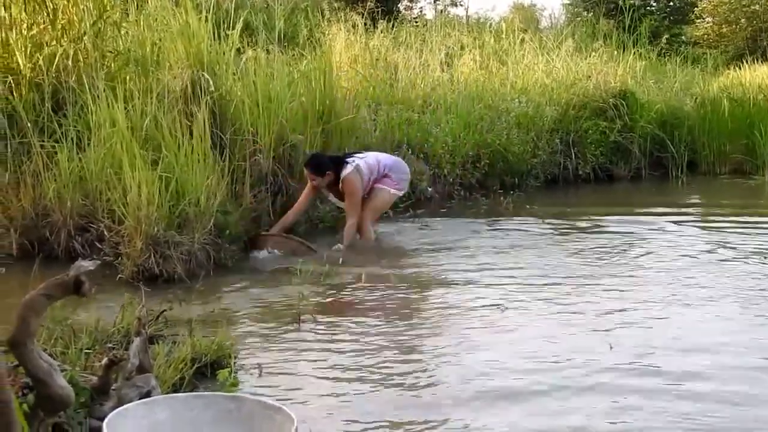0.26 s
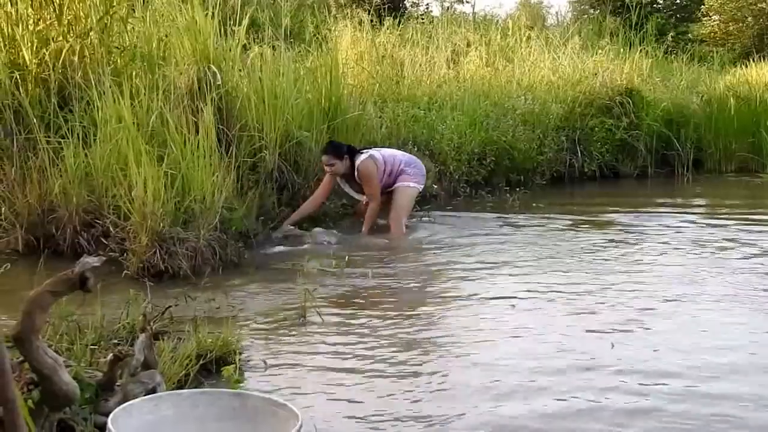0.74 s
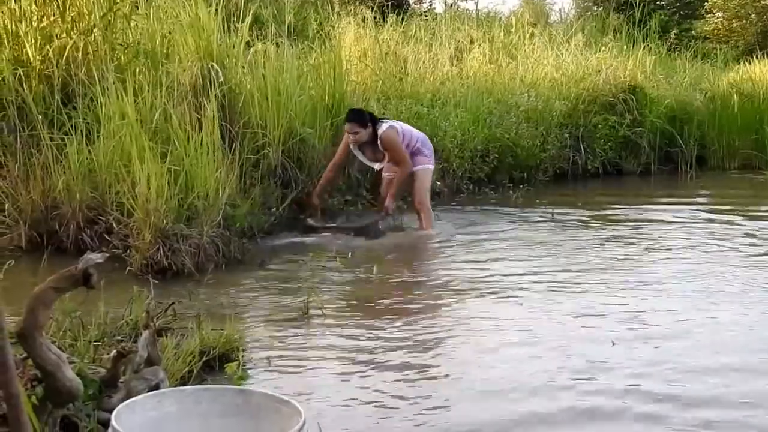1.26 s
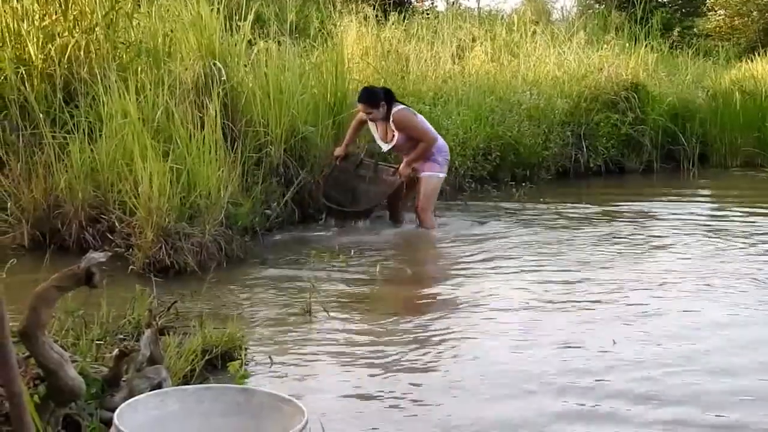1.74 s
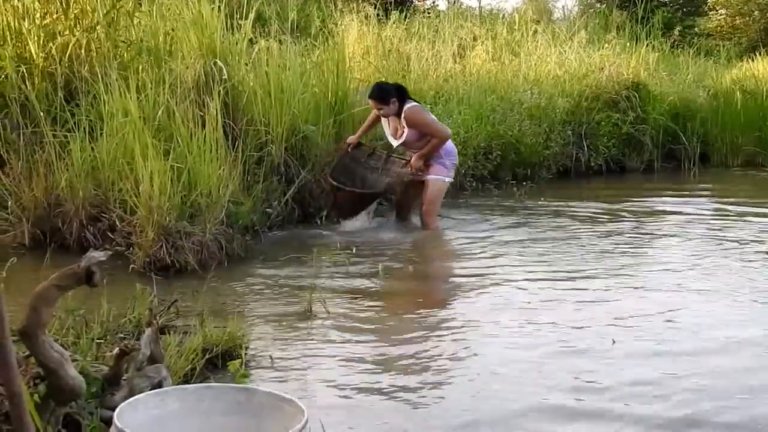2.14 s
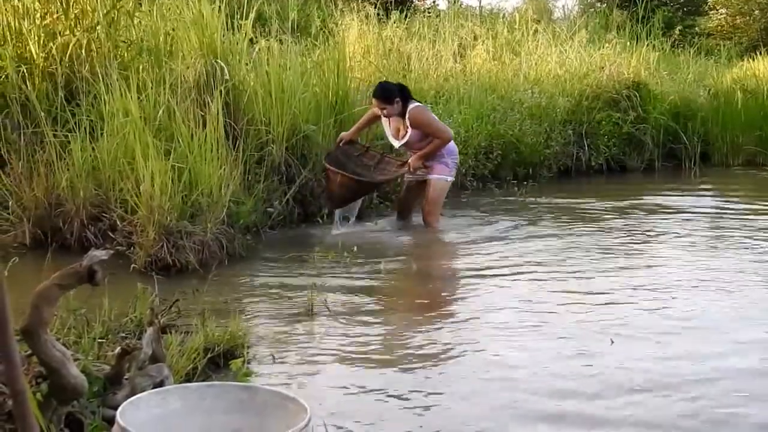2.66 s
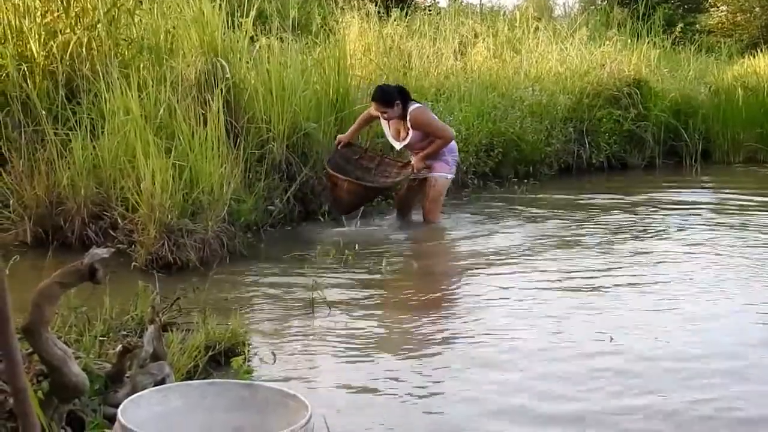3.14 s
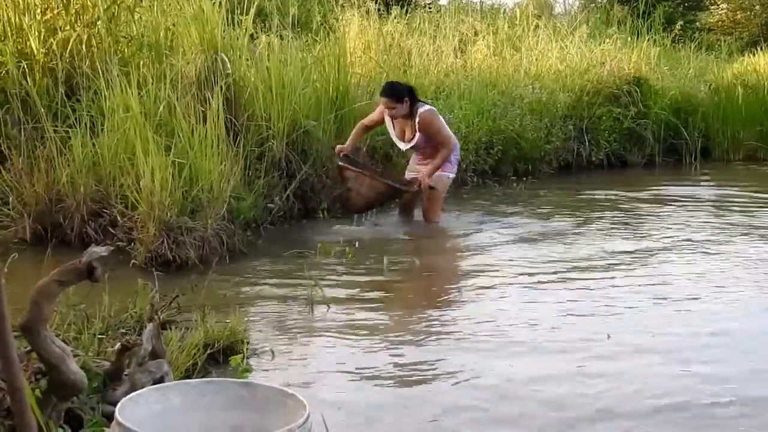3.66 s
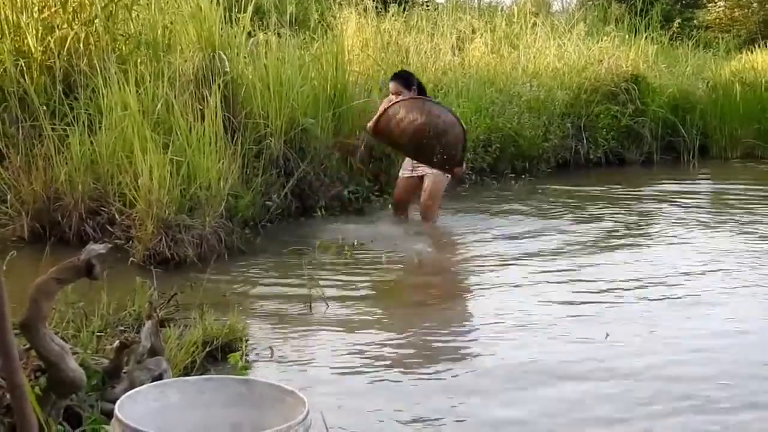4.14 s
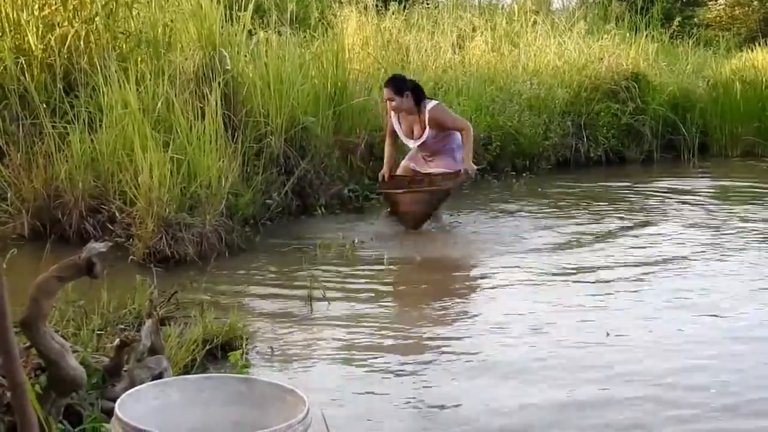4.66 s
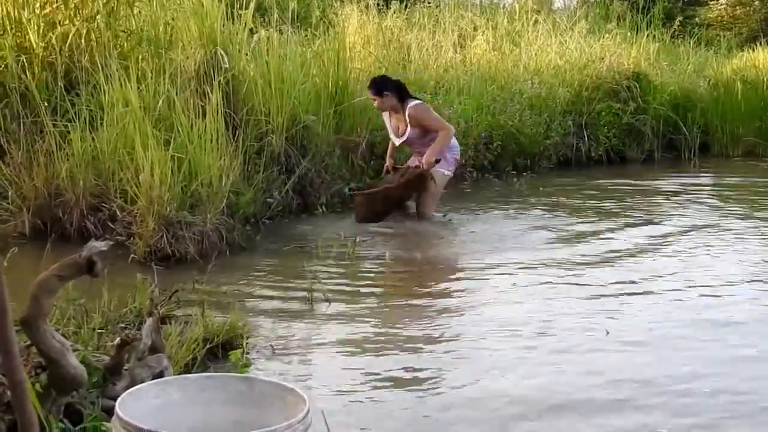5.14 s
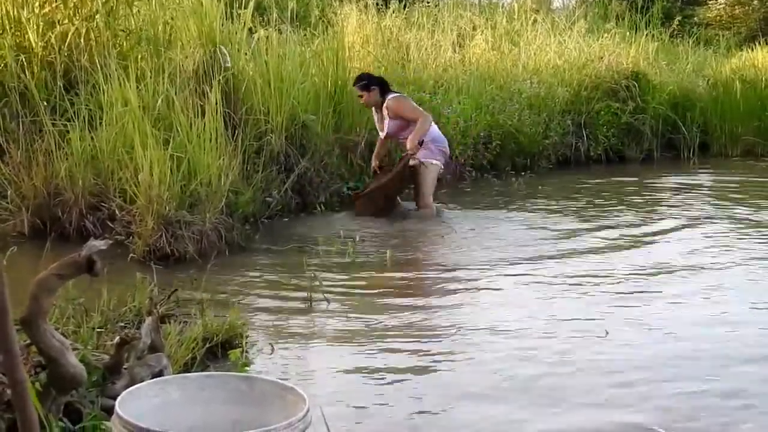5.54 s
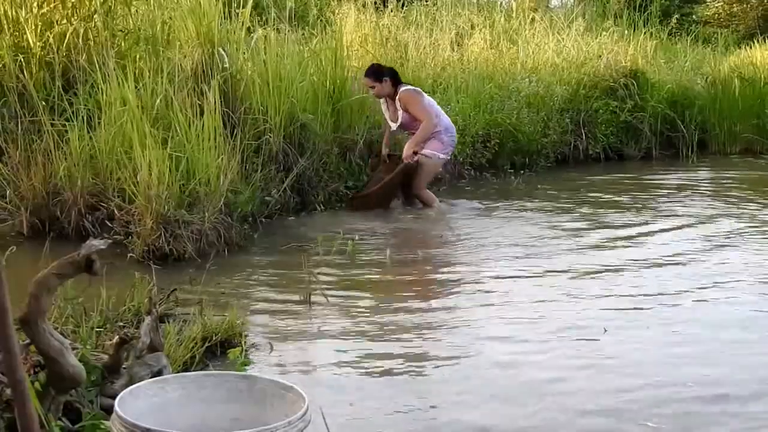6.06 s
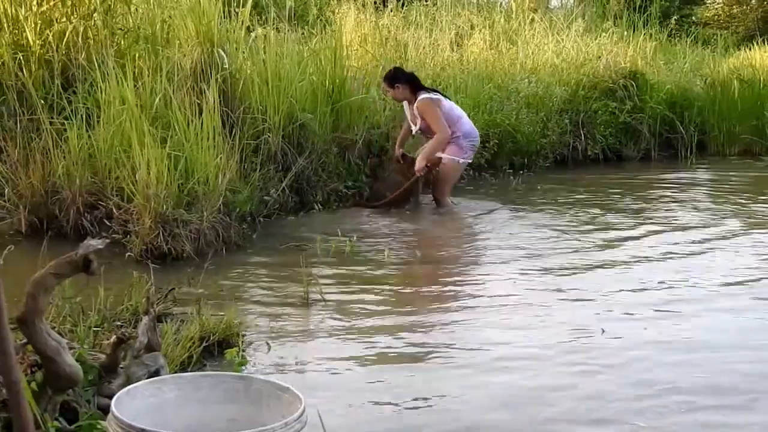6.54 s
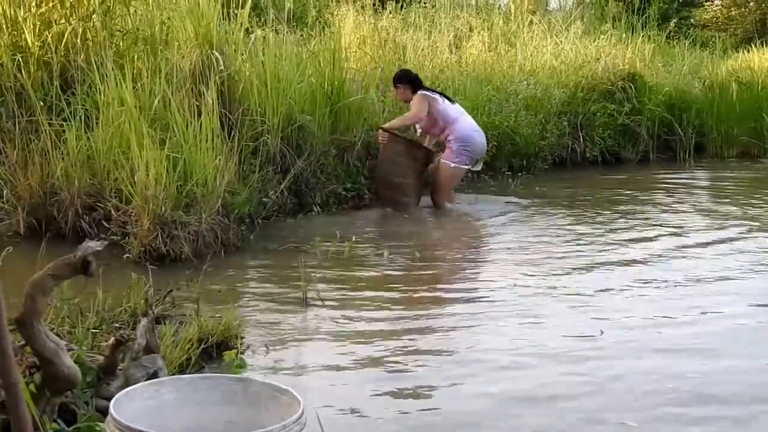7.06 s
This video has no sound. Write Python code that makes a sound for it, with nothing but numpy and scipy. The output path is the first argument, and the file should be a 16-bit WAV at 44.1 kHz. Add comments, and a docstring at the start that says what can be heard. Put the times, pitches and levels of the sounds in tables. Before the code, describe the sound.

Bubbly sloshing and splashing open at once, followed by water pouring through a lifted basket and thinning to drips. Two tiny rasping croaks pass midway. Dull slaps and small splashes lead to a heavy gulping plunge, then ripples settle. Distant slow engines throb underneath, with a high insect hiss, a cricket chirping regularly and soft falling bird whistles. Open, nearly dry field heard in stereo from the shore.

```python
"""Far engines chug and hum and insects hiss throughout, all shaped from pulses, sine waves or noise.
At once a basket scoops in a shallow stream: swarms of ringing bubbles slosh, plop and spray.
From 0.9 s the lifted basket pours, and from 2.8 s it drips; all along a cricket trills in gliding tones.
A small bird whistles falling chips from 0.9 to 4 s, and two buzzing croaks sound at 3 s. Wet smacks of
noise fall from 2.3 s, most between 4.8 and 5.8 s; at 5.9 s the basket plunges in with plops and bubbles."""
import sys
import numpy as np
from scipy import signal
from scipy.fft import rfft, irfft, next_fast_len
from scipy.io import wavfile
from scipy.ndimage import uniform_filter1d, map_coordinates

SR = 44100
rng = np.random.default_rng(int(sys.argv[2]) if len(sys.argv) > 2 else 0)


def bounce(signal):
    """Save signal as a 16-bit WAV file at the path given by the first command-line argument."""
    frames = np.transpose(np.atleast_2d(signal))
    limited = np.clip(frames, -1, 1)
    pcm = np.round(limited * 32767).astype(np.int16)
    wavfile.write(sys.argv[1], SR, pcm)


N = 321930

# Levels are in dB; some functions add a further gain.


def amp(db):
    """Turn decibels into gain."""
    return 10 ** (np.asarray(db) / 20)


def unit(x):
    """Scale to an rms (average strength) of 1."""
    return x / np.sqrt(np.mean(x ** 2) + 1e-20)


def along(points, hz):
    """Read a curve of (f/Hz, value) points on a log frequency axis."""
    f, v = np.transpose(points)
    return np.interp(np.log(hz + 1), np.log(f + 1), v)


def curves(rows):
    """Draw straight lines through timed rows: one value per sample for each column after the time."""
    s, *cols = np.transpose(rows)
    return [np.interp(np.arange(N) / SR, s, c) for c in cols]


def wobble(rate):
    """A smooth random curve through `rate` random points a second."""
    points = rng.standard_normal(int(N * rate / SR) + 4)
    return map_coordinates(points, [np.arange(N) * rate / SR], mode="nearest")


def add(track, s, sound):
    """Mix a sound into a track at s seconds."""
    part = track[max(0, round(s * SR)):][:len(sound)]
    part += sound[:len(part)]


def swell(s, attack_s, hold_s, t60_s):
    """Gain that rises from s seconds, holds, then drops 60 dB in each t60_s."""
    t = np.arange(N) / SR - s
    fading = np.maximum(t - attack_s - hold_s, 0)
    return np.clip(t / attack_s, 0, 1) * np.exp(-np.log(1000) * fading / t60_s)


def filtered(x, response):
    """Multiply the spectrum of x by a response of frequency."""
    m = next_fast_len(N + SR // 4)
    return irfft(rfft(x, m) * response(np.fft.rfftfreq(m, 1 / SR)), m)[..., :N]


def coloured(x, spectrum, size=8192):
    """Filter with the gain of (f/Hz, level/dB) points, ringing only after each sound and never before."""
    cepstrum = irfft(np.log(amp(along(spectrum, np.fft.rfftfreq(size, 1 / SR))) + 1e-6))
    # folding the cepstrum gives the minimum-phase filter
    fold = np.r_[1, np.full(size // 2 - 1, 2), 1, np.zeros(size // 2 - 1)]
    return signal.fftconvolve(x, irfft(np.exp(rfft(cepstrum * fold))))[:N]


def spread(a, b, alike):
    """Blend two unrelated signals into a stereo pair as alike as the curve asks at each pitch; rms 1."""
    def turn(hz):
        return np.arccos(np.clip(along(alike, hz), -1, 1)) / 2

    mid, side = filtered(np.array([a, b]), lambda hz: np.array([np.cos(turn(hz)), np.sin(turn(hz))]))
    return unit(np.array([mid + side, mid - side]))


def aside(x, lag_s):
    """Place a sound to one side: it reaches the right microphone port lag_s sooner than the left."""
    return filtered(x, lambda hz: np.exp(np.pi * 1j * hz * lag_s * np.array([[-1], [1]])))


def panned(x, db):
    """A stereo pair, db louder on the left than on the right."""
    return x * amp([[db / 2], [-db / 2]])


# How alike left and right are for the fields all around: f/Hz, likeness [-1 to 1]
FAR_ALIKE = [(60, 0.98), (120, 1.0), (250, 0.97), (510, 0.83), (1050, 0.84), (2130, 0.78), (4130, -0.2),
             (5500, 0.05), (9500, 0.015)]


def rush(spectrum, alike=FAR_ALIKE):
    """Stereo noise with the given colour; rms 1."""
    noise = rng.standard_normal((2, N))
    return spread(*filtered(noise, lambda hz: amp(along(spectrum, hz))), alike)


# Colour of the far engine rumble: f/Hz, level/dB
RUMBLE = [(12, -61), (20, -60), (49, -19.5), (88, -10), (172, -3), (267, -13.5), (365, -20), (450, -34),
          (580, -66), (990, -120)]


def rumble():
    """Far engines blur into low noise that swells gently."""
    return amp(-35 + 1.2 * wobble(2.85)) * rush(RUMBLE)


# Colour of the air in the grass: f/Hz, level/dB
FIELD = [(250, 0.5), (420, -10), (579, -6), (698, 9), (799, 7), (886, -8), (1210, 10), (1460, -2),
         (1720, -16), (2270, -1), (2500, -13), (2920, -7), (3700, -17), (4110, -7), (5000, -37),
         (6500, -38), (11000, -120)]


def grass():
    """Air moving in the grass makes soft, nearly steady noise."""
    return amp(-51.0 + 0.12 * wobble(2.3)) * rush(FIELD)


# A thin far whirr swells and fades: t/s, level/dB
WHIRR = [(0, -50.5), (2.8, -62), (3.8, -52.5), (4.4, -50.5), (5.0, -52), (5.6, -54), (6.6, -59), (7.0, -52),
         (7.3, -47)]
# Resonances of the whirr: f/Hz, level/dB
WHIRR_COLOUR = [(480, -74), (620, -6), (730, -2.5), (900, -3.5), (1100, -19), (1240, 2), (1430, -15),
                (1650, 3.5), (1790, 5.5), (1930, -1), (2400, -43)]


def whirr():
    """Noise through a few resonances comes and goes as a thin far whirr."""
    return amp(curves(WHIRR)[0] + 2.0) * rush(WHIRR_COLOUR)


# Colour of the insect hiss: f/Hz, level/dB
INSECTS = [(2650, -20), (4500, -12), (5090, -39), (5340, -31), (5480, 7), (5930, -52), (6340, 4.5),
           (6870, 1), (7280, 11.5), (7740, 12), (8200, 3), (8510, -8), (9360, -10.5), (12200, -82),
           (20600, -120)]
# How alike left and right are for the insects: f/Hz, likeness [-1 to 1]
CHORUS_ALIKE = [(4000, 0.24), (7500, 0.17), (10000, 0.23)]


def insects():
    """Many insects merge into a high flickering hiss, a touch sooner on the left."""
    return amp(-44.0 + 0.96 * wobble(14)) * aside(rush(INSECTS, CHORUS_ALIKE), lag_s=-.00002)


# Narrow band of one far insect: f/Hz, level/dB
TRILL = [(3000, -90), (3780, -29), (3875, 9), (3925, -18), (3980, -2), (4130, -10), (4250, -28),
         (5200, -90)]


def trill():
    """One far insect trills as narrow-band noise."""
    return amp(-63) * rush(TRILL)


def firings(rate, start, exhaust, scatter_db, jitter):
    """One exhaust pulse per firing of a single cylinder, `rate` a second, uneven by jitter seconds; rms 1."""
    turns = np.cumsum(rate) / SR - start
    at = np.flatnonzero(np.diff(np.floor(turns)))  # a pulse at each whole number
    size, late = rng.standard_normal((len(at), 2)).T
    at = np.clip(at + late * jitter * SR, 0, N - 1).astype(int)
    return unit(coloured(np.bincount(at, amp(scatter_db * size), N), exhaust))


def echoed(x, delay_s, db):
    """The tree line answers once, delay_s later; rms 1."""
    return unit(x + amp(db) * np.pad(x, (round(delay_s * SR), 0))[:N])


# Exhaust colour of the chugging engine: f/Hz, level/dB
CHUG = [(25, -50), (43, -44), (72, -11.5), (100, -7.5), (140, -7.5), (175, 0), (220, -1.5), (260, -3.5),
        (300, -14), (360, -23), (450, -44), (1200, -110)]


def chugging_engine():
    """A slow engine fires 14.48 times a second, each firing a dull pulse; rms 1."""
    pulses = firings(np.full(N, 14.48), .415, CHUG, scatter_db=1.5, jitter=.00006)
    return echoed(pulses, delay_s=.048, db=-13.5)


# Speed of the labouring engine: t/s, firings a second [f/Hz]
LABOUR = [(0, 15), (1, 14.58), (2, 14.42), (3, 14.24), (4, 14.14), (4.7, 14.11), (5.5, 14.585),
          (6.3, 15.03), (7.3, 15.27)]
# Exhaust colour of the labouring engine: f/Hz, level/dB
THUD = [(25, -35.5), (44, -33), (72, 1), (100, -7), (117, 2), (135, -2.5), (160, 7.5), (180, -11),
        (215, -5.5), (245, -9), (288, -18), (314, -13), (340, -22.5), (400, -31.5), (1200, -110)]


def labouring_engine():
    """A second slow engine sags in speed and picks up again, each firing a thud; rms 1."""
    pulses = firings(curves(LABOUR)[0], .607, THUD, scatter_db=1.6, jitter=.00006)
    return echoed(pulses, delay_s=.0188, db=-3.0)


# Overtones of the pump engine: multiple of the shaft rate, level/dB
PUMP = [(1, -22), (2, 1.5), (3, -14), (4, -4.5), (5, -16), (6, -17)]


def pump(hz=50.1, start=0.285):
    """A faster engine, so far off that only its low overtones arrive, as shimmering sines; rms 1."""
    shaft = 2 * np.pi * (np.cumsum(hz + 0.025 * wobble(2.43)) / SR - start)
    hum = np.zeros(N)
    for k, (_, db) in enumerate(PUMP, 1):
        hum += amp(db + .8 * wobble(4.6)) * np.sin(k * shaft + k * k)
    return unit(hum)


# Engine loudness, with a short rise near 3.2 s where the two engines' firings fall together:
# t/s, chugging level/dB, labouring level/dB
ENGINE_LEVELS = [(0, -33.5, -33), (1.5, -36, -32.5), (2.5, -37.5, -33.5), (3.15, -36, -33.5),
                 (3.21, -32.5, -33), (3.28, -33, -33.5), (3.4, -37, -36), (4.4, -37, -36),
                 (5.2, -37.5, -36.5), (6.2, -37.5, -34.5), (7.3, -36.5, -36.5)]
# Level of the hum near 100 Hz, dipping where it beats with the chugging engine, then steadier:
# t/s, level/dB
HUM = [(0, -41.5), (0.8, -35), (1.2, -36.5), (1.5, -35), (2.09, -38), (2.56, -33.5), (3.03, -39),
       (4.04, -32), (4.51, -44), (4.72, -33), (6, -32.5), (7.3, -32)]


def engines():
    """Two slow engines drift in and out of step while the faster pump hums."""
    chug_db, labour_db = curves(ENGINE_LEVELS)
    slow = amp(chug_db) * chugging_engine() + amp(labour_db) * labouring_engine()
    return slow + amp(curves(HUM)[0]) * pump()


# Two short rough croaks: t/s, length/s, resonance f/Hz, level/dB
CROAKS = [(2.963, .038, 700, -36), (3.066, .028, 780, -39.5)]


def croaks():
    """A low rasping buzz sags in pitch as it passes through one resonance."""
    pitch_hz, fall, width_oct = 169, 0.069, 0.23
    track, k = np.zeros(N), np.arange(2, 12)[:, None]  # k counts the overtones
    for s, length_s, hz, db in CROAKS:
        u = np.linspace(0, 1, int(length_s * SR))
        phase = 2 * np.pi * np.cumsum(pitch_hz * (1 + fall * (.5 - u))) / SR
        overtones = 1 / (1 + (np.log2(k * pitch_hz / hz) / width_oct) ** 2)
        buzz = np.sum(overtones * np.sin(k * phase + rng.uniform(0, 2 * np.pi, k.shape)), axis=0)
        rasp = 1 + .5 * wobble(345)[:len(u)]
        add(track, s, amp(db) * np.sin(np.pi * np.sqrt(u)) * unit(rasp) * buzz)
    return track


# A small bird's falling chips: t/s, level/dB, middle f/Hz
CHIPS = [(0.851, -51.5, 3120), (1.53, -46, 3200), (2.82, -45, 3140), (3.0744, -56, 3110),
         (3.745, -49, 3200), (3.814, -44, 3240), (4.002, -53, 3180)]


def bird():
    """Short soft whistles that slide down."""
    chip_s, fall = .036, .16  # fall is a share of the middle pitch
    track, t = np.zeros(N), np.arange(SR // 15) / SR
    u = np.minimum(t / chip_s, 1)
    for s, db, hz in CHIPS:
        phase = 2 * np.pi * np.cumsum(hz * (1 + fall * (.5 - u))) / SR
        add(track, s, amp(db) * np.sin(np.pi * u) * np.sin(phase))
    return track


# Cricket chirps: start t/s, level/dB
CHIRPS = [(0.601, 2.5), (1.309, 2.5), (1.955, 3.5), (2.625, 2.5), (3.296, 2.5), (3.972, 3), (4.566, 2.5),
          (5.258, 3), (5.979, 2.5), (6.663, 1.5)]
# Wing strokes of one chirp, in order: level/dB
STROKES = [-43, -41.5, -41.5, -41, -50]


def cricket():
    """Each wing stroke slows as it closes, so its tone falls, wavering a little."""
    hz, fall_hz, stroke_s, period_s = 5830, 780, .026, .037
    track, t = np.zeros(N), np.arange(SR // 20) / SR
    u = np.minimum(t / stroke_s, 1)
    for s, chirp_db in CHIRPS:
        for k, db in enumerate(STROKES):
            size, sharp, late = rng.standard_normal(3)  # no two strokes are quite the same
            waver = unit(uniform_filter1d(rng.standard_normal(len(t)), size=120))
            stroke_hz = hz + 40 * sharp + 50 * waver - fall_hz * u ** 1.4
            tone = np.sin(2 * np.pi * np.cumsum(stroke_hz) / SR)
            stroke = amp(chirp_db + db + .5 * size) * np.sin(np.pi * u ** .8) * tone
            add(track, s + k * period_s + .001 * late, stroke)
    return track


# How fast the bank's echo dies: f/Hz, time to drop 60 dB [s]
BANK = [(300, 0.037), (2000, 0.35), (9000, 0.016)]


def bank(x):
    """Short diffuse answer of the grassy bank: fading noise, different on each side."""
    hz, t, z = signal.stft(rng.standard_normal((2, SR // 4)), SR, nperseg=256)
    tail = signal.istft(z * amp(-60 * t / along(BANK, hz)[:, None]), SR, nperseg=256)[1]
    return signal.fftconvolve(x[None], tail / np.linalg.norm(tail[0]), axes=1)[:, :N]


def bubble(t, hz, cycles, rise):
    """A damped sine whose pitch climbs as the bubble nears the surface."""
    age = t * hz / cycles
    tone = np.sin(2 * np.pi * hz * t * (1 + rise * np.minimum(age, 2) / 4))
    return tone * np.exp(-2 * age) * (1 - np.exp(-2 * t * hz))


def bubbles(rate, lo_hz, hi_hz, cycles, scatter_db, size):
    """A random swarm of `rate` bubbles a second, mostly quiet and a few loud; rms 1."""
    when, pitch, strength, life = rng.random((int(rate * N / SR), 4)).T[:, :, None]
    hz = lo_hz * (hi_hz / lo_hz) ** pitch
    gain = amp(-scatter_db * np.log(np.maximum(strength, .02))) * np.sqrt(hz / lo_hz)
    rings = gain * bubble(np.arange(size) / SR, hz, cycles * (.5 + life), rise=0.24)
    places = (when * N).astype(int) + np.arange(size)
    return unit(np.bincount(places.ravel(), rings.ravel(), N)[:N])


# How alike left and right are for the water in front: f/Hz, likeness [-1 to 1]
ALIKE = [(60, 0.97), (250, 0.97), (510, 0.7), (1050, 1), (2130, 0.79), (4360, 0.58), (6500, 0.26),
         (8910, 0.12)]


def churn(swarm, spectrum, wash_db, width_db):
    """Bubbles on a wash of torn water, with diffuse scatter off the ripples; rms 1."""
    direct = unit(coloured(swarm, spectrum))
    scatter = unit(coloured(rng.standard_normal(N), spectrum))
    wide = amp(width_db) * np.array([scatter, -scatter])
    return unit(direct + wide + amp(wash_db) * rush(spectrum, ALIKE))


# Colour of falling water landing on the surface, for the stream and its drips: f/Hz, level/dB
POUR = [(400, -19), (700, -16.5), (1150, 0), (1400, -3.5), (1650, 3.5), (1830, -7.5), (2060, 0),
        (2240, -14), (2480, 4.5), (2750, -7.5), (3470, -5), (4750, -1.5), (6500, 6.5), (7700, -4),
        (12000, -28.5), (16000, -120)]


def drips():
    """The raised basket keeps dripping: single small bubbles start, hold, then thin out."""
    wet = swell(2.76, attack_s=0.16, hold_s=0.96, t60_s=.8)
    drops = bubbles(90, 1800, 7000, cycles=6, scatter_db=2, size=400)
    return amp(-54.5) * wet * unit(coloured(drops, POUR))


def pour():
    """The basket empties through its weave: the gurgling stream builds, holds, then thins, wavering."""
    flow = swell(0.86, attack_s=0.89, hold_s=0.63, t60_s=4.6) * amp(-40.5 + 1.6 * wobble(29.76))
    gurgle = bubbles(900, 609, 4500, cycles=12, scatter_db=2.2, size=600)
    return flow * churn(gurgle, POUR, wash_db=0.0, width_db=-28)


# Dull wet smacks, played as noise only: t/s, level/dB, left over right level/dB
SMACKS = [(2.251, -22, 0), (3.178, -21.5, 0.5), (4.806, -20, -9), (5.154, -20, -9), (5.196, -23, -7),
          (5.311, -23, -10), (5.369, -22, -13), (5.417, -35, -6), (5.707, -23, 0), (5.73, -21, 0)]
# Colour of a smack: f/Hz, level/dB
SMACK_COLOUR = [(300, -32), (620, -1), (1100, 2), (1380, 2), (1620, 1), (2000, -7), (2450, -2), (3200, -22),
                (7000, -53)]


def smacks():
    """A soft slap on the surface: a short dull puff of noise."""
    rise_s, t60_s = 0.003, 0.036
    track, t = np.zeros((2, N)), np.arange(SR // 10) / SR
    for s, db, pan_db in SMACKS:
        puff = amp(db - 60 * t / t60_s) * (1 - np.exp(-t / rise_s)) * rng.standard_normal(len(t))
        for side, sound in zip(track, panned(puff, pan_db)):
            add(side, s, sound)
    return amp(3.0) * np.array([coloured(side, SMACK_COLOUR) for side in track])


# The biggest thrown drops landing: t/s, level/dB, bubble f/Hz
SPATTERS = [(0.3594, -33, 5860), (0.401, -30, 4460), (0.421, -35, 6300), (0.48, -34, 6500),
            (0.5008, -36, 3520), (0.5406, -29, 6630), (0.767, -35.5, 7440), (0.957, -33.5, 5250),
            (1.3736, -31.5, 7630), (1.409, -32.5, 6600), (1.421, -37, 6630), (1.5748, -35.5, 6340),
            (2.0263, -38, 6580), (2.152, -36, 6500), (2.2702, -38, 5800), (2.364, -35, 3700),
            (2.93, -33, 6100), (3.191, -32.5, 4120), (3.655, -41, 4400), (3.812, -37, 3520),
            (3.855, -38, 4430), (4.12, -38, 5030), (4.264, -35, 5220), (4.2872, -39, 4070),
            (4.3314, -38, 4730), (4.78, -29.5, 6500), (4.794, -30.5, 6500), (5.0615, -34, 5520),
            (5.8133, -37, 5370), (5.976, -38, 4140), (6.65, -36, 7550), (6.8604, -44, 5070)]
# Colour of a drop's tick as the microphone hears it: f/Hz, level/dB
TICK = [(300, -40), (2000, -44), (4000, 0.5), (7600, 3), (8800, -15.5), (12000, -27.5), (15000, -49)]


def spatters():
    """A drop ticks on the surface as a burst of noise and leaves a tiny ringing bubble."""
    track, t = np.zeros(N), np.arange(SR // 20) / SR
    for s, db, hz in SPATTERS:
        tick = amp(5.0 - 60 * t / 0.037) * (1 - np.exp(-t / 0.0008)) * rng.standard_normal(len(t))
        add(track, s, amp(db) * (tick + amp(5.0) * bubble(t, hz, cycles=22, rise=0.025)))
    return coloured(track, TICK)


# Air pockets closing under the surface: t/s, level/dB, bubble f/Hz
PLOPS = [(0.04, -26, 1150), (0.045, -25, 1550), (0.085, -25, 1260), (0.15, -24, 1840), (0.256, -27, 1085),
         (0.363, -21, 2480), (0.399, -31, 1160), (0.414, -20, 2580), (0.858, -33, 1150), (0.949, -25, 1080),
         (0.98, -27, 1060), (1.188, -32, 910), (1.337, -19.5, 1150), (1.342, -20.5, 866),
         (1.398, -21, 1940), (1.446, -24.5, 1720), (1.558, -32, 1680), (1.699, -29, 1010),
         (1.777, -28, 1240), (1.876, -31, 2390), (1.947, -34, 1200), (2.006, -22.5, 2390),
         (2.152, -24, 1600), (2.251, -21.5, 1120), (2.362, -20, 2510), (2.395, -22, 2510),
         (2.45, -21, 1610), (2.467, -25, 2510), (2.495, -21, 1510), (3.469, -28, 1210), (3.643, -31, 1110),
         (3.681, -32, 2460), (3.995, -32, 1700), (4.11, -27, 1420), (4.185, -23.5, 1550),
         (4.297, -29, 2460), (5.162, -31, 625), (5.314, -29, 950), (5.373, -27, 1070), (5.616, -26.5, 1590),
         (5.739, -29, 1140), (5.793, -24, 1020), (5.942, -19, 1180), (5.947, -15, 1004),
         (5.954, -23.5, 2630), (5.966, -16.5, 1510), (6.036, -22, 1090), (6.068, -22, 2500),
         (6.078, -22, 2480), (6.102, -15.5, 1120), (6.187, -24, 540), (6.219, -28, 880), (6.328, -28, 1550),
         (6.925, -31.5, 640)]


def plops():
    """The surface snaps and slaps shut as noise, then the trapped air rings."""
    slap_db, slap_t60_s, crack_db, crack_t60_s, ring_db = 3, .025, 0.5, 0.0082, -4.5
    slaps, rings, t = np.zeros(N), np.zeros(N), np.arange(SR // 10) / SR
    for s, db, hz in PLOPS:
        slap = amp(db + slap_db - 60 * t / slap_t60_s) * (1 - np.exp(-t / 0.0028))
        crack = amp(db + crack_db - 60 * t / crack_t60_s)  # the first snap of a closing pocket
        add(slaps, s, slap * rng.standard_normal(len(t)))
        add(slaps, s, crack * rng.standard_normal(len(t)))
        add(rings, s, amp(db + ring_db) * bubble(t, hz, cycles=12, rise=0.072))
    return amp(-4.0) * coloured(slaps, SLOSH) + rings


# The basket shoves water and a cloud of large bubbles breaks loose: t/s, level/dB, middle f/Hz
GULPS = [(0.029, -34.5, 510), (0.036, -29, 1340), (0.92, -44, 492), (1.337, -35, 965), (1.459, -40.5, 575),
         (1.6, -41, 610), (4.299, -43, 526), (5.943, -34, 976), (6.07, -27, 241.7), (6.09, -38, 540),
         (6.111, -33.5, 314), (6.175, -34, 499)]


def gulps(count=6, span_s=0.037, pitch_scatter=0.1336):
    """A quick run of large bubbles of about one size, each softer than the last."""
    track, t = np.zeros(N), np.arange(SR // 5) / SR
    for s, db, hz in GULPS:
        for k, (late, pitch) in enumerate(rng.random((count, 2))):
            tone = bubble(t, hz * np.exp(pitch_scatter * (4 * pitch - 2)), cycles=14.6, rise=0.305)
            add(track, s + span_s * (k + late) / count, amp(db + 2.5 - 2.5 * k) * tone)
    return track


# Each push of the basket or a leg: t/s, hold/s, time to drop 60 dB [s], slosh level/dB, spray level/dB
PUSHES = [(0.0, 0.013, 2.6, -32.5, -35.5), (0.226, 0.13, 0.67, -46.5, -47), (0.334, 0.079, 3, -37, -36.5),
          (0.84, 0.015, 0.72, -37, -61), (0.916, 0.036, 0.96, -40.5, -41.5), (1.334, 0.12, 1.4, -40, -48),
          (2.24, .015, 0.24, -38.5, -59), (2.33, 0.14, 0.34, -38.5, -44.5), (3.467, .01, 0.15, -49, -54),
          (3.947, 0.035, 0.57, -42, -42), (4.158, 0.026, 0.25, -42.5, -45.5), (4.263, .03, 4.3, -51, -46),
          (4.761, 0.019, 0.78, -41, -40), (5.036, 0.025, 0.57, -55, -45), (5.106, 0.096, 3.7, -49, -47),
          (5.35, 0.017, 0.26, -39, -51), (5.69, 0.028, 4.4, -42.5, -49), (5.801, 0.0074, 0.082, -41, -42.5),
          (5.938, 0.018, 0.89, -35, -43), (6.054, 0.027, 0.81, -35.5, -40.5), (6.31, 0.033, 0.92, -41, -48),
          (6.637, .01, 0.37, -54, -48), (6.818, 0.016, 3.2, -48, -50), (7.177, 0.11, .5, -59, -50.5)]
# Fine drops shaken off the rim patter down: t/s, hold/s, fizz level/dB
SHOWERS = [(1.8, 0.3, -55), (2.243, 0.022, -55), (2.764, 0.023, -54.5), (2.87, 0.14, -53.5),
           (4.137, 0.089, -58.5), (6.231, 0.087, -54)]


def agitation():
    """Slosh, spray and fizz gains: lapping that never settles, pushes and showers add in power."""
    lap_db = [-49.5, -54.5, -64.5]  # slosh, spray, fizz
    power = np.outer(amp(lap_db), amp(1.5 * wobble(9.9))) ** 2
    for s, hold_s, t60_s, slosh_db, spray_db in PUSHES:
        push_db = [slosh_db, spray_db, spray_db - 29]  # the finest drops follow the spray
        attack_s = 0.008 + 0.25 * hold_s  # longer pushes rise more slowly
        power += np.outer(amp(push_db), swell(s, attack_s, hold_s, t60_s)) ** 2
    for s, hold_s, fizz_db in SHOWERS:
        power[2] += (amp(fizz_db) * swell(s, 0.025, hold_s, t60_s=0.26)) ** 2
    return np.sqrt(power)


# Colour of the big bubbles, also of a plop's slap: f/Hz, level/dB
SLOSH = [(220, -39.5), (380, 0), (474, -5), (552, -0.5), (655, -10), (763, -5), (852, -3.5), (1150, 3),
         (1370, -3), (1640, 4), (1830, -15.5), (2080, -2), (2250, -22), (2530, -4), (2900, -31),
         (3770, -37), (6380, -120)]
# Colour of the small bubbles and ticks: f/Hz, level/dB
SPRAY = [(1180, -14.5), (2000, 1.5), (2250, -5.5), (2510, -2.5), (2920, -7), (3480, -2), (3710, -8.5),
         (4020, -1), (4740, -3.5), (5010, 1), (5540, -0.5), (6610, 4.5), (7090, -3), (7740, -22),
         (9000, -13.5), (11700, -28), (19800, -120)]
# Colour of the finest drops: f/Hz, level/dB
FIZZ = [(3820, -13.5), (6500, -5.5), (7000, -4), (7300, 2), (7760, -3.5), (8350, -14), (8520, -26),
        (9360, -23), (12200, -38), (20600, -120)]


def water():
    """Big bubbles slosh round the basket, small ones spray, thrown drops tick and the finest ones fizz."""
    slosh_gain, spray_gain, fizz_gain = agitation()
    surge = wobble(35)  # each wavelet breaks on its own
    big = bubbles(900, 419.6, 3005, cycles=15.5, scatter_db=3.5, size=900)
    small = bubbles(2200, 2080, 8260, cycles=16.6, scatter_db=4.0, size=450)
    finest = bubbles(1500, 6630, 12300, cycles=4.8, scatter_db=4.5, size=100)
    thrown = bubbles(260, 1530, 6650, cycles=3.5, scatter_db=5.0, size=200)
    slosh = churn(big, SLOSH, wash_db=-3.5, width_db=-34)
    spray = churn(small, SPRAY, wash_db=1, width_db=-21.0)
    fizz = churn(finest, FIZZ, wash_db=4.5, width_db=-1.5)
    ticks = unit(coloured(thrown, SPRAY))
    sloshing = slosh_gain * amp(-5.0 + 2.7 * surge) * slosh
    spraying = spray_gain * amp(1.0 + 1.07 * surge) * (spray + amp(-13.5) * ticks)
    return sloshing + spraying + fizz_gain * amp(14.0) * fizz


def scene():
    """Water in front, cricket and bird on the right, croaks on the left, engines a little to the left."""
    background = rumble() + grass() + whirr() + insects() + trill()
    far_engines = panned(engines(), db=0.5)
    calls, frog = cricket() + bird(), croaks()
    low, high = plops() + gulps(), spatters()
    among_grass = amp(-7) * calls + amp(-9) * frog
    echoes = bank(amp(-25) * low + amp(-8.0) * high + among_grass)
    stream = water() + pour() + drips() + smacks() + low + high
    animals = aside(calls, lag_s=.00003) + panned(frog, db=5)
    return background + far_engines + animals + echoes + stream


# Treble tilt: a bump near 8.1 kHz, a dip just above it, and a lift towards the top: f/Hz, level/dB
TREBLE = [(7700, 0.5), (8120, 5.5), (8230, -5), (8650, 5.5), (8950, 1.5), (9600, 4.5), (10200, -1),
          (11800, 8.5)]


def record(dry):
    """The treble is tilted and nothing is kept above 15200 Hz; both ends fade over 4 ms."""
    t = np.arange(N) / SR
    fade = np.clip(np.minimum(t, t[::-1]) / .004, 0, 1)
    return filtered(dry * fade, lambda hz: amp(along(TREBLE, hz)) * (hz < 15200))


dry = scene()
out = record(dry)
bounce(out)
```